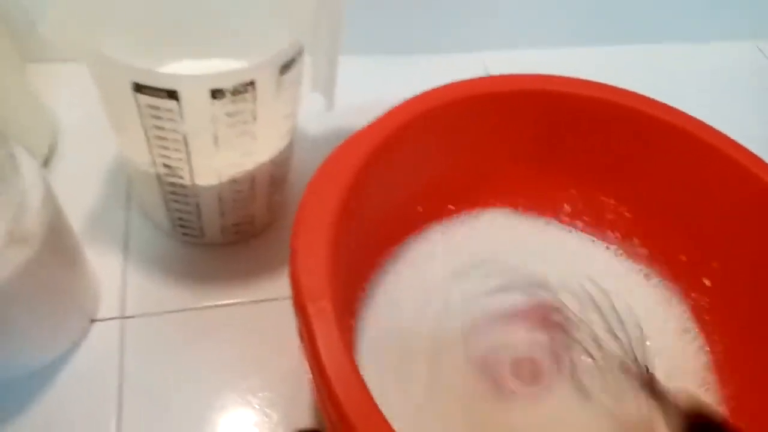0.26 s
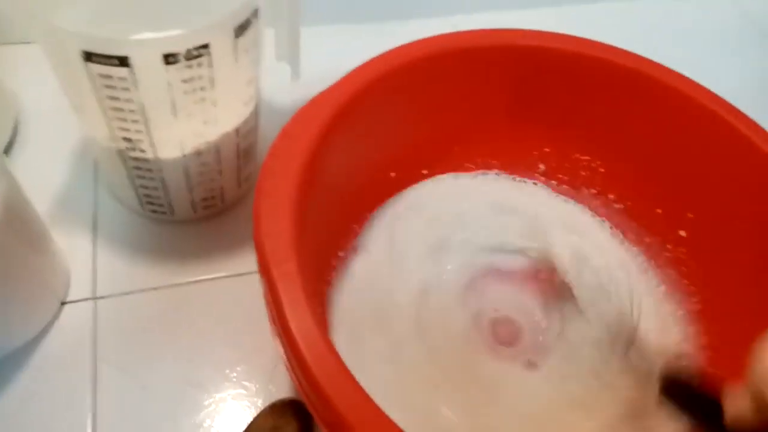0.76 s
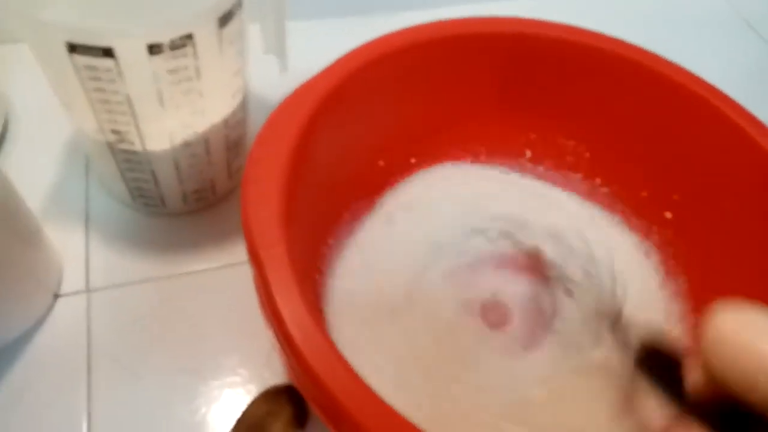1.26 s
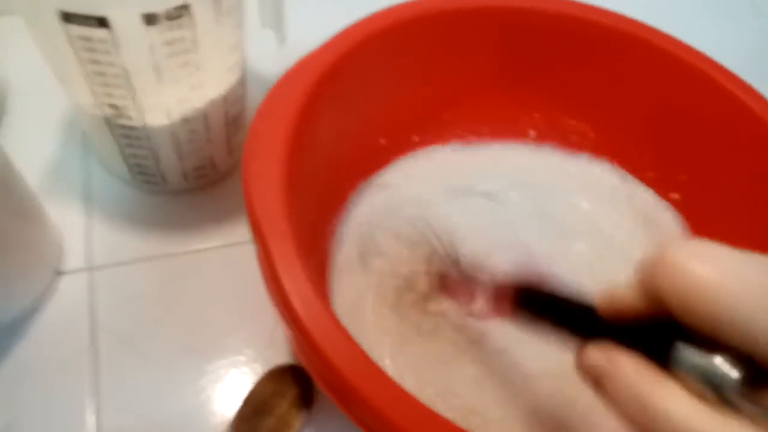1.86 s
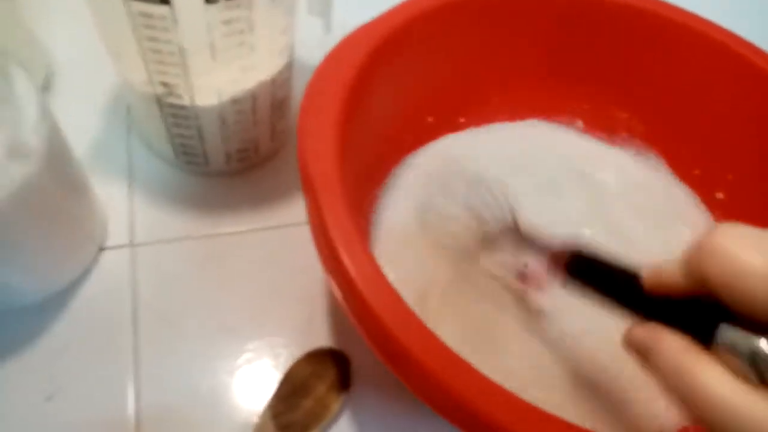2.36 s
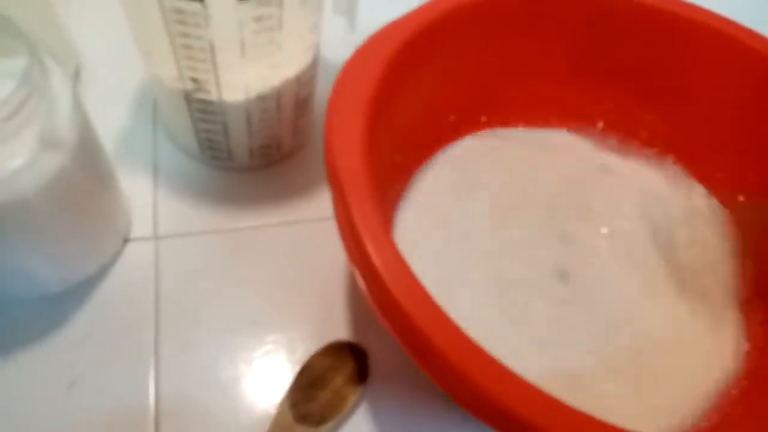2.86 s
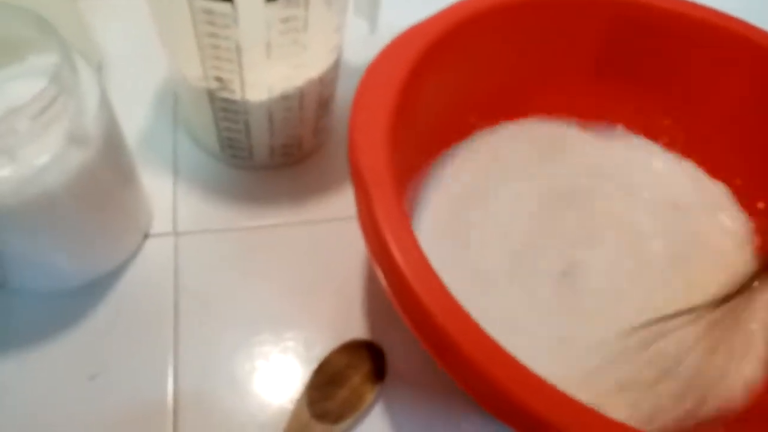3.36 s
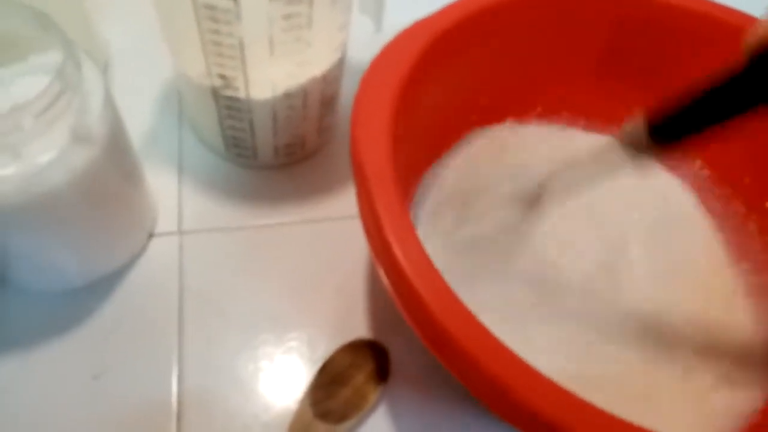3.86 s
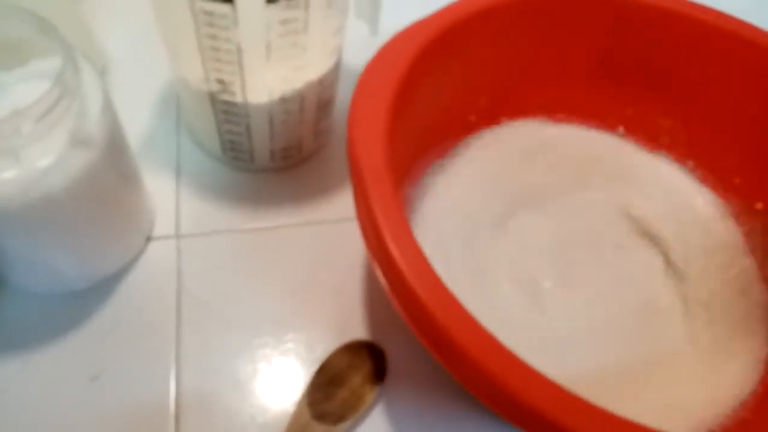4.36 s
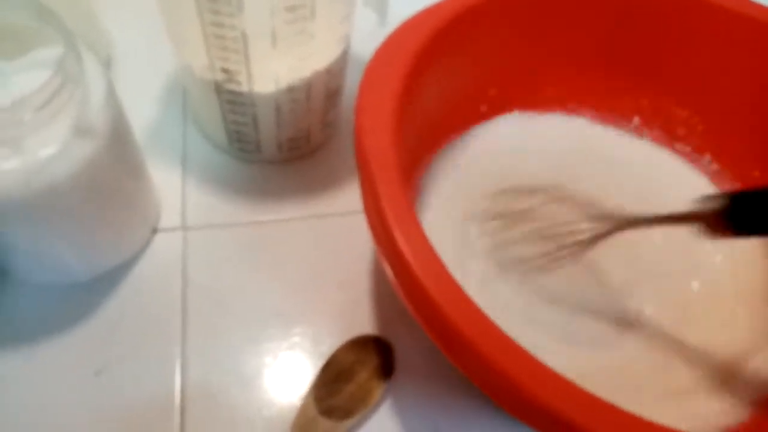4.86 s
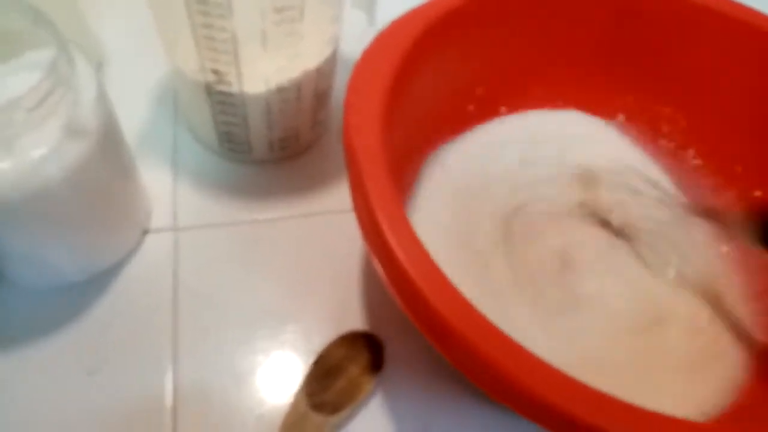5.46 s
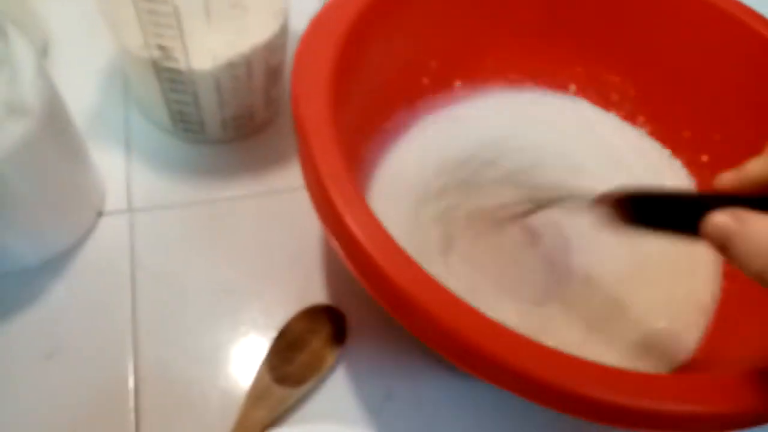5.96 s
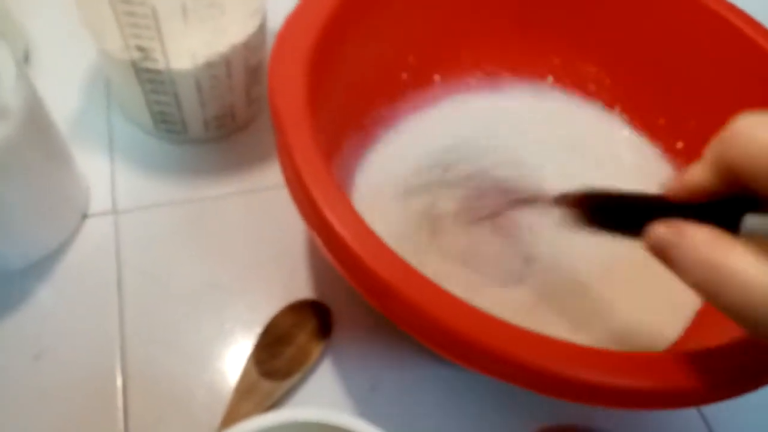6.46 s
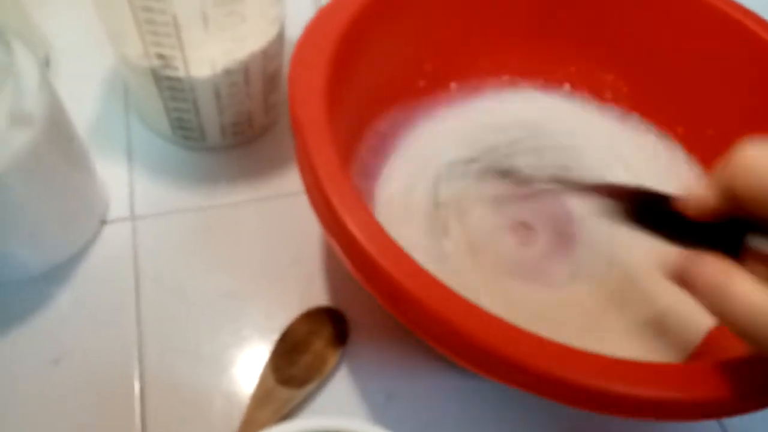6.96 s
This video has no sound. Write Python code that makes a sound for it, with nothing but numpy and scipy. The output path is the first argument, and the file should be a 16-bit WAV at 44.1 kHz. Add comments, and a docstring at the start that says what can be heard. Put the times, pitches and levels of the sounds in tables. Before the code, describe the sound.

A wire whisk works thin batter in a plastic bowl on a tiled counter, heard close in stereo with slight small-room echo and a faint hush. From 0 to 1.5 seconds it beats steadily, about four strokes a second, each a raspy push and lighter return with bright, fizzy spray, hollow plastic knocks and thin metallic ticks. From 1.5 to 2.8 seconds the strokes hit harder, with clustered rattles, heavier wet slaps, low gulps and dull bowl thuds. From about 2.9 to 4.8 seconds it turns much quieter: wide, uneven swishes, soft wire taps and distinct bubbly plips near 3.1 and 3.5. Around 4.9 the beating resumes, at first slower and looser, with a clear bloop at 5.3. From 5.9 to just past 7 seconds it is brisk and regular again, scraping, sloshing and knocking, with a sharp burst near 6.2 and wiry clinks at the end.

```python
"""Whisking batter in a plastic bowl

A wire whisk beats thin batter on a tiled counter, about four strokes a second, with slower, wider
stirring in the middle. Filtered noise grains make scrape, spray and slosh; struck resonators ring as
bowl, wall and wires; gliding sines make bubbles and booms. Two close microphones, a small room."""
import sys
import numpy as np
from scipy import signal
from scipy.fft import rfft, irfft, next_fast_len
from scipy.io import wavfile
from scipy.ndimage import uniform_filter1d

SR = 44100
rng = np.random.default_rng(int(sys.argv[2]) if len(sys.argv) > 2 else 0)


def dump(signal):
    """Clip the signal to [-1, 1] and save it as 16-bit WAV at the path in sys.argv[1]."""
    limited = np.clip(np.atleast_2d(signal).T, -1, 1)
    pcm = np.round(limited * 32767).astype(np.int16)
    wavfile.write(sys.argv[1], SR, pcm)


N = 317961
TIME_S = np.arange(N) / SR


def amp(db):
    """Decibels to gain."""
    return 10 ** (np.asarray(db) / 20)


def unit(x):
    """Scales to rms 1."""
    return x / np.sqrt(np.mean(x ** 2) + 1e-20)


def read(points, hz, column=1):
    """Reads one column of a table on a log-frequency axis."""
    table = np.transpose(points)
    return np.interp(np.log(hz + 1), np.log(table[0] + 1), table[column])


def add(mix, at_s, sound):
    """Mixes a sound in at time at_s."""
    part = mix[..., max(round(at_s * SR), 0):][..., :sound.shape[-1]]
    part += sound[..., :part.shape[-1]]


def colour(x, points, column=1, size=2048):
    """Causal filter with the given spectrum; the phase follows from the log gain."""
    hz = abs(np.fft.fftfreq(size, 1 / SR))
    log_gain = np.log(amp(read(points, hz, column)))
    response = np.exp(np.conj(signal.hilbert(log_gain)))
    fir = np.fft.ifft(response).real[:size // 2]
    return signal.fftconvolve(x, fir[None], axes=1)[:, :x.shape[1]]


def ring(x, modes):
    """A bank of resonances driven by x."""
    out = 0
    for hz, width_hz, db in modes:
        b, a = signal.iirpeak(hz, hz / width_hz, fs=SR)
        out = out + amp(db) * signal.lfilter(b, a, x)
    return out


def drift(size):
    """A slow random curve of rms 1."""
    once = uniform_filter1d(rng.standard_normal(N), size)
    return unit(uniform_filter1d(once, size))


# likeness of the two microphones: (f/Hz, likeness/0-1)
MIC_LIKENESS = [(60, .97), (520, .92), (750, .45), (1130, .75), (1450, .35), (2200, .15), (4000, .04),
                (15000, .02)]


def noise_pair():
    """Noise at both microphones: alike in the bass, scattered by the bowl in the treble."""
    size = next_fast_len(N)
    a, b = rfft(rng.standard_normal((2, size)))
    same = read(MIC_LIKENESS, np.fft.rfftfreq(size, 1 / SR))
    return irfft([a, same * a + np.sqrt(1 - same ** 2) * b], size)[:, :N]


def grains(per_s, spread_db, decay_s, smooth):
    """A crowd of tiny bursts of uneven size over a smooth share; level 1 over any short stretch."""
    excess_db = spread_db * np.minimum(rng.exponential(1, N), 4)
    sizes = amp(excess_db) * (rng.random(N) < per_s / SR)
    power = signal.lfilter([1], [1, -np.exp(-2 / (decay_s * SR))], sizes ** 2)
    power = power + smooth * power.mean()
    return noise_pair() * np.sqrt(power / uniform_filter1d(power, size=1800))


def shifting(x, depth_db, life_s, width_hz):
    """Folds and pockets of liquid open and close, so patches of the spectrum come and go."""
    z = signal.stft(x, nperseg=512, noverlap=384)[2]
    hz = np.arange(-16, 17) * SR / 512
    s = np.arange(-24, 25) * 128 / SR
    blur = np.outer(np.exp(-(hz / width_hz) ** 2), np.exp(-(s / life_s) ** 2))
    patches = unit(signal.fftconvolve(rng.standard_normal(z.shape[1:]), blur, "same"))
    gain = amp(depth_db * patches)
    gain /= np.sqrt(uniform_filter1d(gain ** 2, size=35, axis=0))  # evens the level along frequency
    return signal.istft(z * gain, nperseg=512, noverlap=384)[1][:, :N]


def detuned(x, depth):
    """Batter climbs and leaves the wall, so its resonances slide; depth is the rms pitch ratio shift."""
    lag = drift(size=3500)
    lag = lag * depth / np.diff(lag).std()
    n = np.arange(N)
    return np.array([np.interp(n + lag, n, side, period=N) for side in x])


# room hush spectrum: (f/Hz, level/dB)
HUSH_SPECTRUM = [(20, -25), (80, 20), (300, -23), (800, -18), (15000, 7.5)]


def room_hush(db=-69):
    """Steady coloured noise of the room."""
    return amp(db) * unit(colour(noise_pair(), HUSH_SPECTRUM))


# reverberation of the kitchen: (f/Hz, t60/s)
KITCHEN_T60 = [(100, 0.74), (2000, 0.73), (6000, 0.07), (15000, 0.68)]


def kitchen(x, wet_db=-15):
    """Sparse echoes off tiles and walls, each band dying at its own speed."""
    size = SR // 2
    echoes = rng.choice([-1., 1.], (2, size)) * (rng.random((2, size)) < .06)
    echoes[:, :150] = 0
    hz, t, z = signal.stft(echoes, SR, nperseg=256)
    decay = amp(-60 * t / read(KITCHEN_T60, hz)[:, None])
    tail = signal.istft(z * decay, SR, nperseg=256)[1]
    tail = tail / np.linalg.norm(tail[0])
    return x + amp(wet_db) * signal.fftconvolve(x, tail, axes=1)[:, :N]


# fast beating, one row a turn: a push through the batter, then a return along the wall
# (t/s, rise/s, hold/s, scrape level/dB, swish level/dB, boom level/dB, slosh level/dB,
#  return delay/s, return length/s, return scrape level/dB, return swish level/dB)
BEAT_TURNS = [(0.0, 0.00019, 0.0039, -29.5, -32.5, -51, -48, 0.051, 0.066, -45.5, -42.5),
              (0.192, 0.016, 0.054, -37.5, -35, -62, -37.5, 0.11, 0.033, -35.5, -39.5),
              (0.443, 0.014, 0.056, -36.5, -36, -48, -68, 0.11, 0.034, -33, -38),
              (0.682, 0.015, 0.069, -35.5, -36, -45.5, -40, 0.098, 0.055, -34, -41),
              (0.913, 0.029, 0.049, -35, -36, -56, -61, 0.11, 0.042, -33.5, -43),
              (1.16, 0.0067, 0.062, -33, -36, -49.5, -56, 0.11, 0.04, -37, -41),
              (1.383, 0.021, 0.06, -35, -39, -70, -44, 0.11, 0.04, -37.5, -59),
              (1.563, 0.012, 0.0048, -29, -37.5, -40.5, -30, 0.076, 0.055, -40, -35.5),
              (1.789, 0.013, 0.023, -28, -37, -39.5, -32.5, 0.086, 0.034, -33.5, -34),
              (2.042, 0.016, 0.019, -31.5, -38.5, -43, -31.5, 0.051, 0.11, -61, -38),
              (2.299, 0.029, 0.0049, -30, -39, -45, -32, 0.095, 0.043, -58, -42),
              (2.558, 0.016, 0.011, -29, -41, -40, -30.5, 0.061, 0.019, -58, -46),
              (4.871, 0.022, 0.015, -37, -51, -72, -63, 0.067, 0.077, -40.5, -65),
              (5.121, 0.083, 0.028, -41.5, -38, -46.5, -44, 0.14, 0.051, -41, -42.5),
              (5.401, 0.068, 0.04, -35.5, -39.5, -55, -51, 0.13, 0.046, -51, -40),
              (5.705, 0.007, 0.009, -38.5, -36, -56, -50, 0.036, 0.11, -44, -44),
              (5.936, 0.024, 0.082, -38.5, -41, -53, -47, 0.091, 0.094, -43.5, -50.5),
              (6.209, 0.0194, 0.011, -29, -33.5, -45.5, -37, 0.086, 0.043, -34, -47),
              (6.445, 0.033, 0.061, -37, -35, -45, -35, 0.11, 0.081, -45, -44),
              (6.701, 0.023, 0.062, -37, -36.5, -53, -43, 0.11, 0.046, -41, -42),
              (6.94, 0.022, 0.055, -35.5, -36, -49, -40, 0.12, 0.022, -33, -39.5)]
# slow, wide stirring, one row a sweep:
# (t/s, rise/s, hold/s, scrape level/dB, swish level/dB, boom level/dB, slosh level/dB)
STIR_SWEEPS = [(2.971, 0.017, 0.19, -59, -46, -80, -64), (2.999, 0.033, 0.08, -47.5, -67, -72, -35.5),
               (3.352, 0.0096, 0.11, -49, -42, -86, -55), (3.503, 0.069, 0.011, -68, -42.5, -67, -44),
               (3.671, 0.07, 0.027, -46, -44, -64, -46), (3.922, 0.0093, 0.023, -41, -54, -48.5, -38.5),
               (3.976, 0.006, .02, -53, -60, -55, -43), (4.02, 0.037, 0.083, -60, -47, -81, -74),
               (4.196, 0.11, 0.017, -59, -43.5, -67, -72), (4.39, 0.025, 0.022, -47, -40, -83, -74),
               (4.549, 0.011, 0.076, -46.5, -42.5, -55, -38.5), (4.688, 0.034, 0.057, -50, -44.5, -57, -63),
               (4.973, 0.0095, 0.014, -57, -46, -43.5, -37), (5.032, 0.033, 0.012, -42, -45, -63, -68)]
PUSH_FALL_DB_PER_S, RETURN_FALL_DB_PER_S, STIR_FALL_DB_PER_S = 243, 227, 161
RETURN_RISE = 0.519  # share of a return spent gathering speed
RETURN_BOOM_DB, RETURN_SLOSH_DB = -11, -4.5  # the return's wave relative to the push's


def moves():
    """Every move: (t/s, rise/s, hold/s, fall/(dB/s), scrape, swish, boom, slosh level/dB)."""
    rows = [(s, rise, hold, STIR_FALL_DB_PER_S, *levels) for s, rise, hold, *levels in STIR_SWEEPS]
    for s, rise, hold, scrape_db, swish_db, boom_db, slosh_db, after, length, *back_db in BEAT_TURNS:
        rows.append((s, rise, hold, PUSH_FALL_DB_PER_S, scrape_db, swish_db, boom_db, slosh_db))
        rows.append((s + after, RETURN_RISE * length, (1 - RETURN_RISE) * length, RETURN_FALL_DB_PER_S,
                     *back_db, boom_db + RETURN_BOOM_DB, slosh_db + RETURN_SLOSH_DB))
    return rows


HEAVE_LAG_S = 0.0039  # the batter trails the wires


def waves():
    """At full speed each move throws a wave at the wall: (t/s, rise/s, boom level/dB, slosh level/dB)."""
    return [(s + rise + HEAVE_LAG_S, rise, boom_db, slosh_db) for s, rise, *_, boom_db, slosh_db in moves()]


# wires dragging and batter swirling between the moves: (t/s, scrape level/dB, swish level/dB)
CHURN_LEVELS = [(0, -46, -55), (1.15, -53, -50.5), (1.7, -45, -44), (2.25, -37, -64), (2.66, -46.5, -44),
                (2.8, -57, -60.5), (2.96, -62, -46.5), (3.1, -50.5, -52.5), (4.4, -50, -50.5),
                (4.54, -51, -58), (4.82, -49, -66), (5.15, -52.5, -55), (5.8, -48, -44.5),
                (7.2, -53.5, -50.5)]
LIFT_DB, LIFT_LEAD_S, LIFT_S = -3, 0.017, 0.0087  # the whisk lifts clear just before each push


def stroke_levels():
    """Gains of scrape and swish: each move gathers speed, holds and dies away, over the churning."""
    power, t = np.zeros((2, N)), np.arange(SR // 2) / SR
    pushes_s = np.array([row[0] for row in BEAT_TURNS])
    for s, rise, hold, fall, scrape_db, swish_db, _, _ in moves():
        shape = np.minimum(t / rise, 1) * amp(-fall * np.maximum(t - rise - hold, 0))
        lift_at_s = pushes_s[pushes_s > s].min(initial=2 * N / SR) - LIFT_LEAD_S
        lifted = np.clip((s + t - lift_at_s) / LIFT_S + 1, 0, 1)
        gain = amp([[scrape_db], [swish_db]]) * shape * amp(LIFT_DB * lifted)
        add(power, s, gain ** 2)
    clear = sum(np.exp(-((TIME_S - s + LIFT_LEAD_S) / LIFT_S) ** 2) for s in pushes_s)
    when_s, *churn_db = np.transpose(CHURN_LEVELS)
    churn = amp([np.interp(TIME_S, when_s, db) + LIFT_DB * clear for db in churn_db])
    return np.sqrt(power + churn ** 2)


# thud spectrum: (f/Hz, level/dB)
THUD_SPECTRUM = [(25, -22), (50, -33), (80, 7), (130, 0), (200, -5), (500, -71), (2000, -75)]


def thuds(db=-10.5, rise_s=0.008, fall_s=0.073):
    """The deep part of each wave shoves the bowl against the counter with a dull, pitchless thud."""
    level, t = np.zeros(N), np.arange(SR // 4) / SR
    shape = (1 - np.exp(-t / rise_s)) * np.exp(-t / fall_s)
    for s, _, boom_db, _ in waves():
        add(level, s, amp(boom_db) * shape)
    return amp(db) * level * unit(colour(noise_pair(), THUD_SPECTRUM))


# booms of the filled bowl, before the glide: (f/Hz, t60/s, level/dB)
BOOM_MODES = [(99, 0.47, -2), (181, 0.26, -4)]


def heaves(swell_s=0.0039, wobble=0.083, sag_per_s=0.72):
    """The mass of batter pushes the bowl, which booms at a pitch that glides as the load shifts."""
    out, t = np.zeros(N), np.arange(SR // 3) / SR
    rows = waves()
    for (s, _, boom_db, _), loads in zip(rows, rng.uniform(-0.3, 1, (len(rows), len(BOOM_MODES)))):
        for (hz, t60_s, db), load in zip(BOOM_MODES, loads):
            shape = (1 - np.exp(-t / swell_s)) ** 2 * amp(-60 * t / t60_s)
            turns = hz * t * (1 + load * (wobble - sag_per_s * t))
            add(out, s, amp(boom_db + db) * shape / shape.max() * np.sin(2 * np.pi * turns))
    return out


def bubbles(level, db=-7, low_hz=1200, high_hz=8000, cycles=10, rise=0.056, count=2200):
    """Trapped air rings briefly and rises in pitch as it nears the surface."""
    out, t = np.zeros((2, N)), np.arange(1600) / SR
    for when, pitch, size, side, turn in rng.random((count, 5)):
        hz = low_hz * (high_hz / low_hz) ** pitch
        age = t * hz / cycles
        side_phase = np.array([[0], [turn * min(hz / 3000, 1)]])
        phase = 2 * np.pi * (hz * t * (1 + rise * age / 2) + side_phase)
        pan = np.sqrt([[side], [1 - side]])
        shape = np.exp(-age) * (1 - np.exp(-8 * age))
        add(out, when * N / SR, amp(-22 * size) * pan * np.sin(phase) * shape)
    return amp(db) * level * unit(out)


def plops(level):
    """Bubbles burst in the wake of the whisk, fewer and lower than the fizz, each chirping upward."""
    return bubbles(level, db=-6.5, low_hz=1400, high_hz=3200, cycles=11, rise=0.035, count=300)


# single pockets of trapped air, deep glugs to small plips: (t/s, f/Hz, level/dB)
AIR_POCKETS = [(0.335, 452, -36.5), (0.724, 268, -50), (1.174, 188, -42.5), (1.226, 498, -39),
               (1.889, 471, -33.5), (2.073, 323, -39.5), (2.126, 505, -32.5), (2.245, 505, -31.5),
               (2.395, 464, -33.5), (2.743, 329, -45.5), (3.037, 760, -40), (3.05, 450, -47),
               (3.074, 1820, -26), (3.239, 317, -46), (3.396, 493, -41), (3.468, 2230, -32),
               (3.925, 332, -38), (4.446, 1510, -32), (4.948, 630, -35), (5.312, 181.5, -44),
               (5.314, 1090, -27), (5.685, 192, -48.5), (5.796, 184, -43.5), (5.95, 182, -47),
               (6.072, 193, -41), (6.338, 480, -35.5), (6.346, 183.4, -47), (6.547, 292, -45),
               (7.033, 2670, -28)]


def glugs(life_s=0.011, at_hz=500, longer_when_deep=0.93, swell=0.22, rise=0.0062):
    """A pocket of air swells, rings and rises a little in pitch; big ones ring longest."""
    out, t = np.zeros(N), np.arange(SR // 4) / SR
    for s, hz, db in AIR_POCKETS:
        age = t / (life_s * (at_hz / hz) ** longer_when_deep)
        shape = (1 - np.exp(-age / swell)) ** 2 * np.exp(-age)
        turns = hz * t * (1 + rise * (age / 2 - 1))
        add(out, s, amp(db) * shape / shape.max() * np.sin(2 * np.pi * turns))
    return out


# slosh spectrum: (f/Hz, level/dB)
SLOSH_SPECTRUM = [(40, -30), (130, -14), (240, -24), (330, -5.5), (480, -1.5), (620, -1.5), (800, -4.5),
                  (1200, -22), (3000, -68)]
# low modes of the whole bowl, also rung by swish, knocks and scrape: (f/Hz, width/Hz, level/dB)
BOWL_RESONANCES = [(102, 5.2, -3.5), (227, 77, -13), (321.2, 14.2, -2.5), (383, 77, -12.5), (504, 38, -3.5),
                   (648, 20, -7)]


def slosh(db=-4, modes_db=-11, gulps_db=-10, rise_s=0.0013, fall_s=0.02, lazy=0.47):
    """Each wave slaps the wall and folds big pockets of air under, which gulp."""
    level, t = np.zeros(N), np.arange(SR // 4) / SR
    for s, rise, _, slosh_db in waves():
        slow_s = lazy * rise  # a slow move makes a slow wave
        shape = (1 - np.exp(-t / (rise_s + slow_s))) * np.exp(-t / (fall_s + slow_s))
        add(level, s - slow_s, amp(slosh_db) * shape)
    slap = grains(per_s=81, spread_db=5.5, decay_s=0.0084, smooth=0.33)
    wall = ring(slap * level, BOWL_RESONANCES) / ring(slap, BOWL_RESONANCES).std()
    gulps = bubbles(level, db=gulps_db, low_hz=264.4, high_hz=845, cycles=15.0, rise=0.07, count=1400)
    return amp(db) * level * unit(colour(slap, SLOSH_SPECTRUM)) + amp(modes_db) * wall + gulps


def pocket(level, db=-5, hz=1750, wander=0.235, width_hz=140, full_db=-37, size=1500):
    """The hollow behind the whisk opens and closes, gliding its resonance; gentle stirring hardly opens it."""
    turn = np.exp(2j * np.pi * np.cumsum(hz * np.exp(wander * drift(size))) / SR)
    r = np.exp(-np.pi * width_hz / SR)
    resonance = (turn * signal.lfilter([1 - r], [1, -r], noise_pair() / turn)).real
    opening = np.minimum(level / amp(full_db), 1)
    return amp(db) * level * opening * unit(resonance)


# bright spray, also the tick of the wires: (f/Hz, level/dB)
SPRAY_SPECTRUM = [(60, -59), (400, -8.5), (900, -14.5), (2000, 2), (3200, -4.5), (5000, -2), (6200, 3),
                  (7200, 4), (8000, 0), (9200, 0), (11000, -11), (15500, -11.5)]


def swish(level, db=2, flicks_db=-2, hum_db=-44):
    """Wires tear foam into fine spray and flick out of the surface; even gentle stirring hums the bowl."""
    spray = grains(per_s=770, spread_db=0.0, decay_s=0.00036, smooth=1.0)
    foam = shifting(unit(colour(spray, SPRAY_SPECTRUM)), depth_db=4, life_s=.015, width_hz=190)
    flicks = grains(per_s=130, spread_db=7.5, decay_s=0.0076, smooth=0.084)
    flicks = unit(colour(flicks, SPRAY_SPECTRUM))
    hum = np.sqrt(level) * unit(ring(spray, BOWL_RESONANCES))
    return level * (amp(db) * foam + amp(flicks_db) * flicks) + amp(hum_db) * hum


# modes of the wire loops, also rung by taps, knocks and scrape: (f/Hz, width/Hz, level/dB)
WIRE_RESONANCES = [(3276, 165, -15.5), (6350, 50, -17), (6528, 62, -6)]


def zings(db=-4, fall_s=0.027):
    """The wire loops ring as they first touch the batter at the start of each fast push."""
    level, t = np.zeros(N), np.arange(SR // 4) / SR
    for s, _, _, _, swish_db, *_ in BEAT_TURNS:
        add(level, s, amp(swish_db) * np.exp(-t / fall_s))
    noise = noise_pair()
    return amp(db) * ring(noise * level, WIRE_RESONANCES) / ring(noise, WIRE_RESONANCES).std()


# rubbed or tapped plastic, also used by scrape: (f/Hz, level/dB)
PLASTIC_SPECTRUM = [(40, -79), (120, -10.5), (300, -30), (560, -10.5), (780, -24), (1000, -8), (1250, -4.5),
                    (1500, 9), (1900, -3), (2400, -14.5), (3200, -9.5), (5000, -10.5), (12000, -51)]


def taps(rubbing, wetness, wall_db=-7, wires_db=-16):
    """Single wires tap the wall at random, harder the faster the whisk moves."""
    hits = grains(per_s=70, spread_db=4.0, decay_s=0.003, smooth=0.02)
    wall = rubbing * unit(colour(hits, PLASTIC_SPECTRUM))
    wires = wetness * unit(ring(hits, WIRE_RESONANCES))
    return amp(wall_db) * wall + amp(wires_db) * wires


# hardest hits of the wires on the wall, often in quick clusters, levels relative:
# (t/s, plastic knock level/dB, wire tick level/dB)
WALL_HITS = [(0.2063, -26, -32), (0.2243, -21.5, -34), (0.3337, -28, -41), (0.3395, -19.5, -45),
             (0.4608, -27.5, -37), (0.4724, -31, -25.5), (0.583, -22, -42), (0.5868, -23, -48),
             (0.6902, -24.5, -36), (0.7147, -36, -26), (0.824, -31, -36), (0.859, -36, -47),
             (0.9338, -22.5, -39), (0.962, -21.5, -29), (1.058, -31, -39), (1.0681, -18.5, -39),
             (1.16, -31, -38), (1.298, -28, -39), (1.3037, -22.5, -38), (1.5693, -19.5, -40),
             (1.5763, -17.5, -43), (1.5947, -17, -25), (1.6, -23, -44), (1.6516, -26, -26.5),
             (1.8002, -25, -42), (1.8114, -16, -24), (1.8235, -17, -25), (1.8361, -17, -30),
             (1.8825, -23.5, -29.5), (2.045, -19.5, -31.5), (2.0669, -20.5, -22), (2.08, -26, -28),
             (2.1278, -25, -31), (2.1336, -34, -34), (2.3, -24, -29), (2.33, -20.5, -25),
             (2.3424, -20.5, -39), (2.3977, -24.5, -26), (2.5682, -21, -29), (2.5891, -22, -28),
             (2.6013, -28, -25), (2.6462, -24.5, -42), (2.7477, -35.5, -45), (2.8297, -31.5, -44),
             (3.2152, -35, -53), (3.2598, -33.5, -49), (3.3604, -50, -33.5), (3.6607, -30, -44),
             (3.7495, -33.5, -34), (3.7967, -37, -58), (3.8433, -35, -36.5), (3.93, -28, -31),
             (3.977, -32.5, -52), (4.151, -35, -55), (4.5573, -33, -37), (4.7037, -32.5, -36),
             (4.903, -30, -30.5), (4.912, -36, -31), (4.949, -29, -33.5), (4.964, -29, -55),
             (4.986, -24, -35), (4.999, -25.5, -37), (5.2151, -33, -32), (5.2213, -25, -43),
             (5.478, -32.5, -26), (5.7189, -26.5, -35), (5.8057, -29, -31), (5.97, -26, -31),
             (5.9743, -20.5, -23), (6.073, -35, -44), (6.2219, -33, -30), (6.2325, -24, -41),
             (6.248, -23, -45), (6.3319, -29, -30.5), (6.478, -25, -32), (6.7273, -22.5, -48),
             (6.9603, -24.5, -32), (7.0877, -29, -30.5)]
# wire loops clash with one another, clear of the wall: (t/s, relative level/dB)
WIRE_CLASHES = [(0.7387, -21), (1.3932, -30), (1.6967, -25.5), (2.19, -30), (3.5716, -27), (4.223, -30),
                (4.754, -32.5), (6.2825, -29), (6.981, -20), (7.0007, -23)]
# hollow knock of a wire on the plastic: (f/Hz, level/dB)
KNOCK_SPECTRUM = [(60, -49), (150, -40), (400, -11), (780, -11.5), (1080, 2), (1450, 5), (2100, 2),
                  (2900, -7), (5000, -15.5), (12000, -61)]


def knocks(knock_db=-3.0, tick_db=-3.0, modes_db=8, wires_db=17, crack_s=0.0033, chatter_s=0.014,
           chatter=0.29, spot_db=-3, spot_s=0.0062, spot_hz=1380, spot_spread=0.14):
    """A hit is a crack, a hollow ring of the struck spot and a chatter of wires; a clash is only bright."""
    t = np.arange(2200) / SR
    shape = np.exp(-t / crack_s) + chatter * np.exp(-t / chatter_s)
    spot_shape = np.exp(-t / spot_s) * (1 - np.exp(-t / 0.00061))
    noise, (out, push, flex) = noise_pair(), np.zeros((3, 2, N))

    def crack(s):
        """A decaying cut of the noise."""
        return np.take(noise, round(s * SR) + np.arange(len(t)), axis=1, mode="wrap") * shape

    def hit(s, spectrum):
        """A coloured crack, its opening scaled to level 1."""
        burst = colour(crack(s), spectrum)
        return burst / burst[:, :140].std()

    places = rng.uniform(-1.07, 1, (len(WALL_HITS), 2))
    for (s, wall_db, wire_db), (turn, place) in zip(WALL_HITS, places):
        hz = spot_hz * (1 + spot_spread * place)
        phase = 2 * np.pi * hz * t + np.pi * np.array([[0], [turn]])
        spot = 2 * np.sin(phase) * spot_shape
        add(out, s, amp(wall_db) * (amp(knock_db) * hit(s, KNOCK_SPECTRUM) + amp(spot_db) * spot))
        add(out, s, amp(wire_db + tick_db) * hit(s, SPRAY_SPECTRUM))
        add(push, s, amp(wall_db) * crack(s))
        add(flex, s, amp(wire_db) * crack(s))
    for s, db in WIRE_CLASHES:
        add(out, s, amp(db + tick_db) * hit(s, SPRAY_SPECTRUM))
        add(flex, s, amp(db) * crack(s))
    return out + amp(modes_db) * ring(push, BOWL_RESONANCES) + amp(wires_db) * ring(flex, WIRE_RESONANCES)


# modes of the wall above the batter, before detuning: (f/Hz, width/Hz, level/dB)
WALL_RESONANCES = [(1150, 61, -3.5), (1390, 15, -6), (1500, 46, -2), (2020, 136, -6.5), (2260, 17, -30)]


def scrape(level, wall_db=-2.0, modes_db=-2.5, bowl_db=-14, wires_db=-9):
    """The wires stick and slip over the plastic; wall, bowl and wire loops ring."""
    slips = grains(per_s=400, spread_db=0.5, decay_s=0.00095, smooth=0.13)
    slips = shifting(slips, depth_db=4.5, life_s=0.029, width_hz=142)
    wall = amp(wall_db) * unit(colour(slips, PLASTIC_SPECTRUM))
    wall = wall + amp(modes_db) * unit(ring(slips, WALL_RESONANCES))
    out = level * detuned(wall, depth=.08)
    for modes, db in (BOWL_RESONANCES, bowl_db), (WIRE_RESONANCES, wires_db):
        out += amp(db) * ring(slips * level, modes) / ring(slips, modes).std()
    return out


RIGHT_LAG_S = .00091


def scene():
    """Whisk, batter and bowl in the room; the sound reaches the left microphone first."""
    rubbing, wetness = stroke_levels()
    bowl = scrape(rubbing) + pocket(rubbing) + swish(wetness) + bubbles(wetness) + plops(wetness)
    bowl = bowl + knocks() + zings() + taps(rubbing, wetness) + slosh() + glugs()
    left, right = kitchen(bowl) + heaves() + thuds()
    right = np.concatenate([np.zeros(round(RIGHT_LAG_S * SR)), right])[:N]
    return np.array([left, right]) + room_hush()


# microphone responses: (f/Hz, left level/dB, right level/dB)
MIC_RESPONSES = [(83, -6, -2), (475, 0.5, 6), (670, -5, -2), (1280, -7.5, -7.5), (2230, -2, -5),
                 (4100, 1, 1.5), (6540, -4, -0.5), (7160, -11, -4), (10500, -10, -4.5), (11000, -31, -2),
                 (13500, -40, -7.5), (14800, -17, 4), (15900, -51, 0.5)]
CUT_HZ = 15800


def record(dry):
    """Each microphone has its own colour; then the band limit."""
    left = colour(dry[:1], MIC_RESPONSES, column=1)
    right = colour(dry[1:], MIC_RESPONSES, column=2)
    low_pass = signal.firwin(511, CUT_HZ, window=("kaiser", 9), fs=SR)
    return signal.oaconvolve(np.vstack([left, right]), low_pass[None], "same")


dry = scene()
out = record(dry)
dump(out)
```